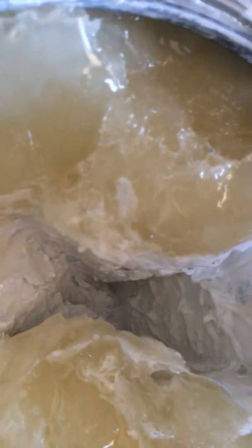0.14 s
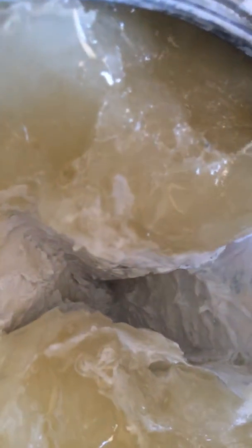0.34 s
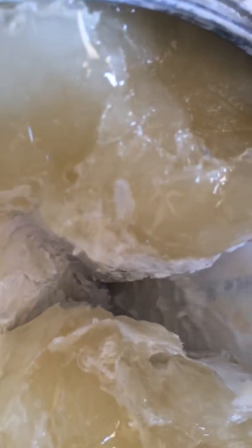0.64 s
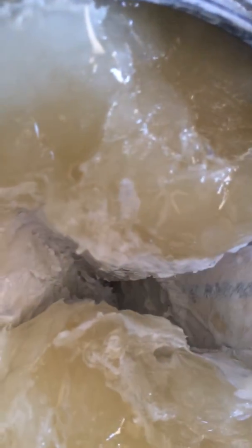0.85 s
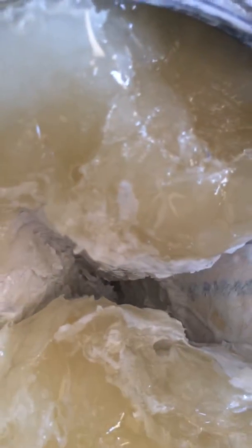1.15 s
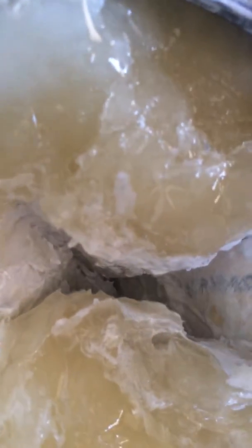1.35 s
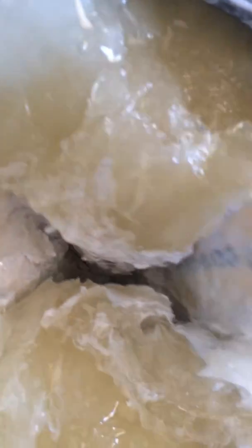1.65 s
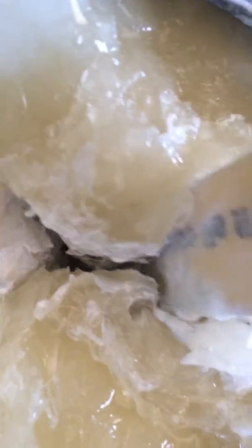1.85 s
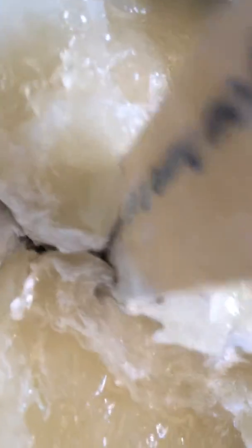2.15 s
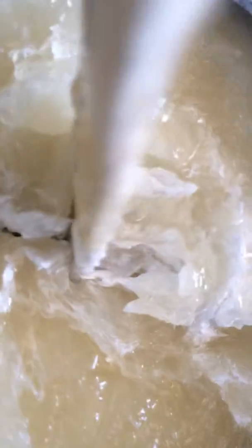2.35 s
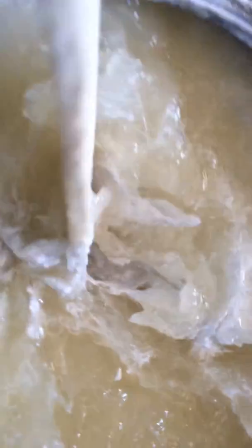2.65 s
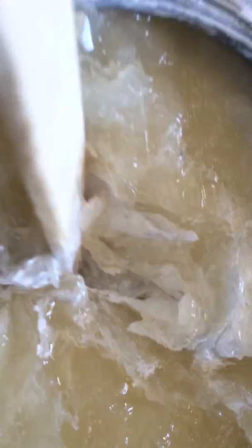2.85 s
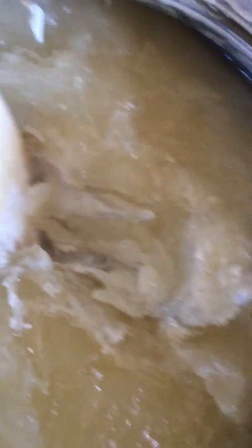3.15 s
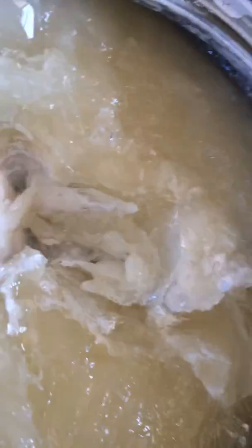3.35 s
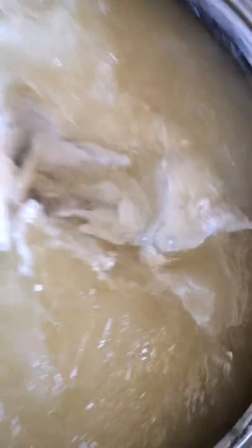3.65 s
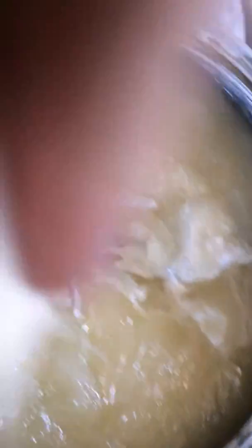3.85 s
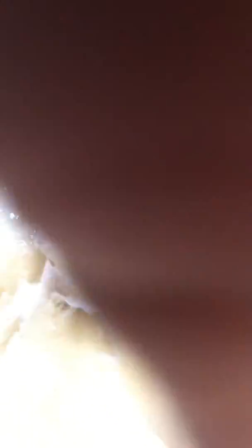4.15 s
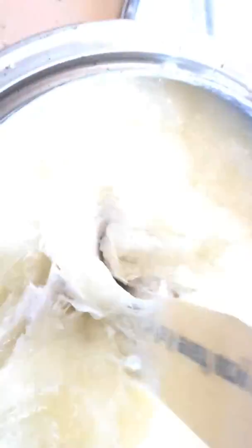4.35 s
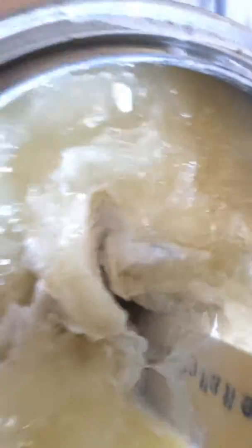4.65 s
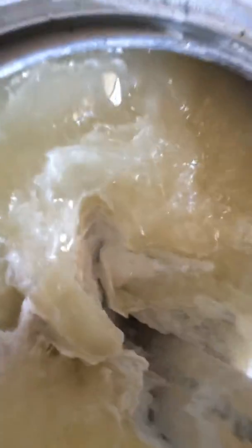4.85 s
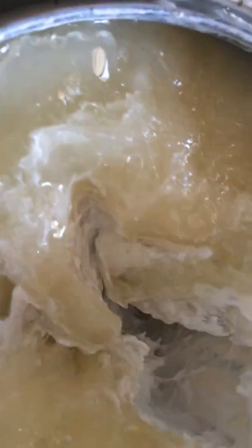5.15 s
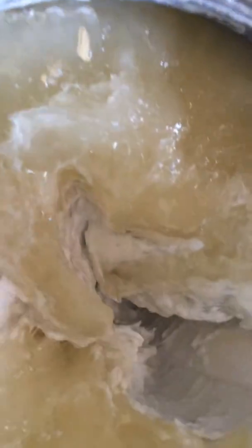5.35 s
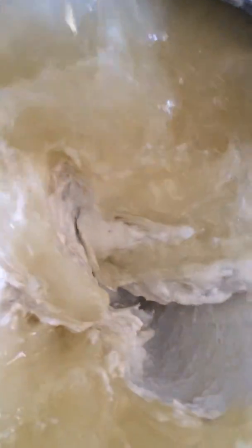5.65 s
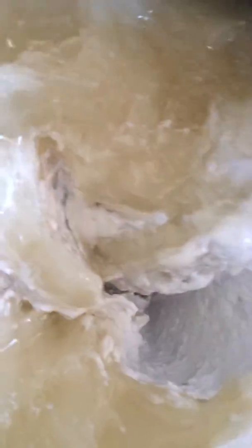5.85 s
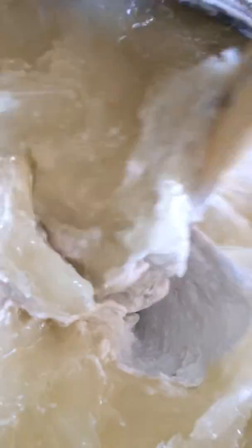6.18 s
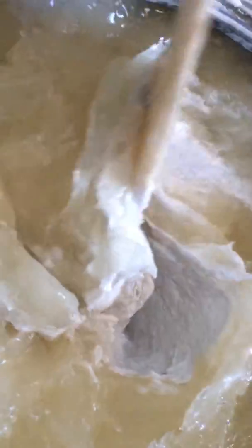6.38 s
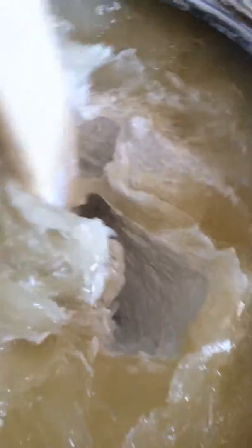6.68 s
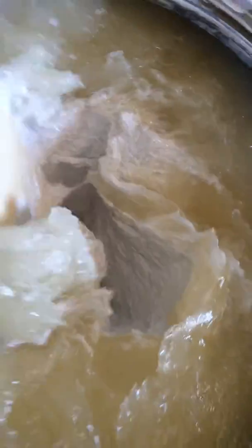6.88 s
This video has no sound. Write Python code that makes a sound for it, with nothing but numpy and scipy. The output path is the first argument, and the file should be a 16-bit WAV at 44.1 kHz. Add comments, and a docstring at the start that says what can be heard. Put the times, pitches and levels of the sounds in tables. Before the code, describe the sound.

Close up, a wooden stick works through thick, half-frozen paint in a metal can, with faint wet crackles, fizz, sharp pops and two early knocks.

```python
"""Thick, half-frozen paint fizzes faintly over a mains hum and the low rumble of a small room.
A wooden stick works through it in a metal can, close to the microphone: noise grains crackle and squelch,
swelling as folds tear and lumps are squashed. Bursts with short rings make the air pockets pop, tick runs
peel the paste off the stick, and gliding noise bands squeak. Decaying modes ring the can under knocks
and scrapes, and low decaying sines thump."""
import sys
import numpy as np
from scipy import signal
from scipy.fft import rfft, irfft, next_fast_len
from scipy.io import wavfile
from scipy.ndimage import uniform_filter1d

SR = 44100
rng = np.random.default_rng(int(sys.argv[2]) if len(sys.argv) > 2 else 0)


def file_out(sig):
    """Save sig as 16-bit WAV at sys.argv[1]."""
    # one column per channel
    cols = np.atleast_2d(sig).T
    # limit, then scale
    lim = np.clip(cols, -1, 1)
    pcm = np.round(lim * 32767).astype(np.int16)
    wavfile.write(sys.argv[1], SR, pcm)


N = 309582
T = np.arange(N) / SR


def amp(db):
    """Decibels to gain."""
    return 10 ** (np.asarray(db) / 20)


def evened(x):
    """Scales to an rms of one."""
    return x / np.sqrt(np.mean(x ** 2) + 1e-20)


def unit(x):
    """Scales to an energy of one."""
    return x / np.linalg.norm(x)


def curves(rows, at=T):
    """Each column of a table as a line through time."""
    seconds, *columns = np.transpose(rows)
    return [np.interp(at, seconds, column) for column in columns]


def add(mix, start, sound):
    """Lays a sound into the mix at start seconds."""
    part = mix[round(start * SR):][:len(sound)]
    part += sound[:len(part)]


def coloured(x, points):
    """Gives x a spectrum, at an rms of one."""
    hz, db = np.transpose(points)
    size = next_fast_len(len(x))
    log_hz = np.log(np.fft.rfftfreq(size, 1 / SR) + 1)
    gain = amp(np.interp(log_hz, np.log(hz), db))
    return evened(irfft(rfft(x, size) * gain, size)[:len(x)])


def tilted(x, tilt, low_hz, size=4096):
    """Causal filter: a slope in dB per octave above a steep low cut."""
    hz = abs(np.fft.fftfreq(size, 1 / SR)) + 20
    slope = amp(tilt * np.log2(np.maximum(hz, low_hz) / low_hz))
    log_gain = np.log(slope / np.sqrt(1 + (low_hz / hz) ** 6))
    # the Hilbert transform of the log gain supplies the minimum phase
    taps = np.fft.ifft(np.exp(np.conj(signal.hilbert(log_gain)))).real
    return signal.fftconvolve(x, taps)[:len(x)]


def resonate(x, hz, width_hz):
    """A resonance of gain one that follows the curve hz."""
    turn = np.exp(2j * np.pi * np.cumsum(hz * np.ones(len(x))) / SR)
    r = np.exp(-np.pi * abs(width_hz) / SR)
    # shift the pitch down to zero, smooth, and shift back
    return 2 * (turn * signal.lfilter([1 - r], [1, -r], x / turn)).real


def grains(per_s, spread_db, wash, clump_db):
    """Tiny ruptures come in clumps, mostly small and a few large, over a wash of still finer ones."""
    size = amp(spread_db * np.minimum(rng.exponential(1, N), 4))
    energy = size ** 2 * (rng.random(N) < per_s / SR)
    energy = signal.lfilter([1], [1, -np.exp(-1 / (0.00052 * SR))], energy)  # each is a very short burst
    bursts = np.sqrt(energy / energy.mean() + wash ** 2) * rng.standard_normal(N)
    clumps = evened(uniform_filter1d(rng.standard_normal(N), size=400))
    return evened(bursts * amp(clump_db * clumps))


def crack(decay, tail, tail_decay):
    """A sharp burst and its short scatter inside the can; decays in seconds."""
    t = T[:SR // 20]
    return rng.choice([-1, 1], len(t)) * (np.exp(-t / decay) + tail * np.exp(-t / tail_decay))


# Mains hum. Each row: frequency in Hz, level in dB rms.
HUM_PARTIALS = [(119.9, -64.5), (240, -82.5), (360, -87.5), (480, -84.5), (962, -106)]
# Colour of the quiet room. Each row: frequency in Hz, relative level in dB per Hz.
ROOM_COLOUR = [(20, -40), (40, -9), (60, 6.5), (85, 4), (130, -0.5), (220, -9), (330, -13.5), (500, -12.5),
               (800, -15.5), (1400, -21.5), (2200, -25.5), (5000, -24.5), (15000, -31.5)]
ROOM_DB = -66  # rms


def background():
    """Mains hum as steady sines, over the rumble and hiss of the room as coloured noise."""
    hum = sum(amp(db) * np.sqrt(2) * np.sin(2 * np.pi * (hz * T + rng.random()))
              for hz, db in HUM_PARTIALS)
    return hum + amp(ROOM_DB) * coloured(rng.standard_normal(N), ROOM_COLOUR)


def walls(x, t60, wet_db):
    """A faint, short return from the room: darkened noise that falls 60 dB in t60 seconds."""
    t = T[:SR // 2]
    noise = coloured(rng.standard_normal(len(t)), [(200, 2), (3000, -4.0), (15000, -8.5)])
    tail = noise * amp(-60 * t / t60) * (t > .004)
    return x + amp(wet_db) * signal.oaconvolve(x, unit(tail))[:N]


# Dull bumps as lumps give way.
# Each row: start in seconds, level in dB before decay and low cut, frequency in Hz, decay in seconds.
LUMP_THUMPS = [(0.905, -27.5, 254, 0.002), (2.4984, -27.5, 74, 0.0062), (2.499, -41.5, 163, 0.007),
               (3.512, -31.5, 141, 0.0034), (3.5125, -35, 403, 0.00095)]


def thumps():
    """A low push that dies within a cycle or two."""
    t, out = T[:SR // 10], np.zeros(N)
    for start, db, hz, decay in LUMP_THUMPS:
        add(out, start, -amp(db) * np.exp(-t / decay) * np.sin(2 * np.pi * hz * t))
    return signal.sosfilt(signal.butter(2, 46, "high", fs=SR, output="sos"), out)


# Modes of the can, damped by its paint.
# Each row: frequency in Hz, relative height of the spectral peak in dB, decay in seconds.
CAN_MODES = [(943, 1, 0.0014), (1270, -5.5, 0.00045), (1830, -12.5, 0.00099), (2460, 3.5, 0.00099),
             (3450, 1.5, 0.00067), (4680, 0.5, 0.00077), (5520, -3, 0.0005), (6730, -8, 0.00026),
             (8530, -12.5, 0.00018), (11000, -14, 0.00017)]


def can_body():
    """The can's response to a touch: each mode swells briefly and dies, with a noisy crack on top."""
    t = T[:SR // 10]
    modes = np.zeros(len(t))
    for k, (hz, db, decay) in enumerate(CAN_MODES):
        envelope = t / decay ** 2 * np.exp(-t / decay)
        modes += (-1) ** k * amp(db) * envelope * np.sin(2 * np.pi * hz * t)
    body = unit(modes)
    add(body, 0, 0.41 * unit(crack(decay=0.0016, tail=0.134, tail_decay=0.00413)))
    return body


# The stick drags along the can.
# Each row: start in seconds, end in seconds, friction level in dB rms before its rise and fall.
CAN_SCRAPES = [(.884, 0.894, -45), (0.897, 0.914, -41.5), (1.195, 1.243, -53), (1.272, 1.305, -56)]


def scrapes(body):
    """Rubbing is a stream of grains that keeps ringing the can's modes."""
    out = np.zeros(N)
    rubbing = grains(per_s=900, spread_db=0.0, wash=1.0, clump_db=0.5)
    friction = evened(signal.oaconvolve(rubbing, body)[:N])
    for start, end, db in CAN_SCRAPES:
        progress = np.clip((T - start) / (end - start), 0, 1)
        out += amp(db) * friction * np.sqrt(abs(np.sin(np.pi * progress)))
    return out


# The stick knocks on the can.
# Each row: start in seconds, level in dB before a common trim, tilt in dB per octave.
CAN_KNOCKS = [(.8851, -16.5, 5), (0.8999, -15, 0), (0.9037, -2, 1), (0.9063, -7, -10), (0.912, -16, -5),
              (0.9164, -30, 5), (1.1482, -2, 0.5), (1.1623, -29, 2), (1.305, -28, -2), (1.3288, -27, -0.5),
              (1.3932, -23.5, -1)]


def knocks(body):
    """Each hit rings the whole can once, tilted to a duller or brighter colour."""
    out = np.zeros(N)
    for start, db, tilt in CAN_KNOCKS:
        add(out, start, amp(db - 4.0) * unit(tilted(body, tilt, low_hz=770)))
    return out


# Air squeezed through slits in the paste. Each row: start in seconds, length in seconds,
# level in dB rms before the fades, start frequency in Hz, end frequency in Hz, resonance width in Hz.
AIR_SQUEAKS = [(0, 0.3, -77, 680, 742.5, 90), (1.686, 0.21, -61.5, 5300, 5165, 900),
               (1.806, 0.078, -58, 7455, 7240, 1300), (3.1878, 0.0086, -31, 12500, 8600, 2300),
               (3.291, 0.016, -43.5, 10500, 9000, 4950), (5.879, 0.085, -61.5, 4640, 4500, 895),
               (5.911, .15, -69, 677, 685, 70), (6.208, 0.092, -73, 800, 780, 70)]


def squeaks():
    """Short, fuzzy whistles of escaping air: noise through two equal gliding resonances."""
    out = np.zeros(N)
    for start, length, db, start_hz, end_hz, width_hz in AIR_SQUEAKS:
        hz = np.linspace(start_hz, end_hz, round(length * SR))
        air = rng.standard_normal(SR)[:len(hz)]
        whistle = resonate(resonate(air, hz, width_hz), hz, width_hz)
        add(out, start, amp(db) * evened(whistle) * signal.windows.tukey(len(hz), .5))
    return out


# The paste lets go of the stick in a run of slips. Each row: start in seconds, end in seconds,
# nominal first peak in dB, nominal last peak in dB, nominal slips per second.
STICK_SLIPS = [(2.213, 2.297, -54, -25.5, 180), (2.318, 2.34, -20.5, -38, 220)]


def slips():
    """Nearly regular bright ticks while the stick peels out of the paste."""
    out = np.zeros(N)
    for start, end, first_db, last_db, per_s in STICK_SLIPS:
        gap_draw, level_draw = rng.standard_normal((64, 2)).T
        times = start + np.cumsum(np.exp(0.21 * gap_draw)) / per_s
        sizes = amp(np.interp(times, [start, end], [first_db, last_db]) + 1.8 * level_draw)
        during = times < end
        out[np.round(times[during] * SR).astype(int)] = sizes[during]
    tick = tilted(crack(decay=0.00051, tail=0.15, tail_decay=0.0019), -0.89, low_hz=6000)
    return signal.oaconvolve(out, tick / abs(tick).max())[:N]


# How hard the stick shears the paste. Each row: time in seconds, effort in dB,
# brightness in dB (lifts the fizz and lowers the squelch).
SHEAR_EFFORT = [(0, -79, 1.5), (.5, -73.5, -0.5), (.83, -64, -3), (.93, -71, -7.5), (1.0, -84, 1),
                (1.36, -79, -3.5), (1.68, -62, -2.5), (2.12, -60.5, -2), (2.42, -65.5, -2),
                (2.8, -65, -1.5), (3.13, -64, 1), (3.55, -68.5, 2.5), (4.3, -66.5, -1), (4.68, -70.5, 2.5),
                (5.08, -65.5, -0.5), (5.92, -64, -1), (6.3, -68, 0.5), (7.02, -63.5, 1)]


def threads(per_s, level_db, spread_db):
    """Sticky threads part at random with faint ticks, more often with effort up to its median."""
    out, t = np.zeros(N), T[:SR // 20]
    activity = amp(curves(SHEAR_EFFORT)[0])
    rate = per_s * np.minimum(activity / np.median(activity), 1) ** 2
    for start in T[rng.random(N) < rate / SR]:
        size, pitch = rng.random(2)
        ring = unit(np.exp(-t / 0.00044) * np.sin(2 * np.pi * 1400 * 5 ** pitch * t))
        snap = unit(tilted(crack(decay=0.00011, tail=0.17, tail_decay=0.0032), -0.27, low_hz=970))
        add(out, start, amp(level_db + spread_db * size ** 2) * (snap + 0.51 * ring))
    return out


# Tears and squashes: rise in seconds, sag in dB per second, die-away time constant in seconds.
SWELL_S, SAG_DB_PER_S, RELEASE_S = 0.024, 26, 0.015


def swell(start, length):
    """The power of one tear or squash through time: attack, sagging hold, release."""
    age = np.maximum(T - start, 0)
    attack = np.minimum(age / SWELL_S, 1)
    release = np.exp(-np.clip((age - length) / RELEASE_S, 0, 20))
    return (attack * amp(-SAG_DB_PER_S * age) * release) ** 2


# A fold of paste tears open with a hiss. Each row: start in seconds, length in seconds,
# fizz level in dB before the swell, crackle level in dB before the swell.
PASTE_TEARS = [(0, .14, -61.5, -74), (0.265, 0.05, -61, -68.5), (0.673, 0.14, -61, -65.5),
               (1.637, 0.059, -39.5, -53), (1.92, .07, -59, -56), (2.202, 0.1, -45.5, -60.5),
               (2.527, 0.11, -55.5, -72), (2.85, 0.086, -58, -65), (2.97, 0.078, -45, -53),
               (3.057, 0.068, -51.5, -56), (3.136, 0.018, -44, -53), (3.333, 0.017, -49.5, -78),
               (3.684, 0.12, -53, -61), (3.85, 0.15, -55.5, -64), (3.942, 0.11, -60, -56.5),
               (4.11, 0.095, -61, -63), (4.212, 0.32, -57, -61), (4.457, 0.031, -53.5, -64),
               (4.575, 0.048, -59, -72), (4.788, 0.038, -54.5, -69), (4.893, .03, -54, -69),
               (5.019, 0.028, -53.5, -56.5), (5.245, .035, -53.5, -58.5), (5.294, 0.066, -58, -60),
               (5.546, 0.16, -60, -76.5), (5.745, 0.099, -57.5, -61), (5.897, 0.029, -56, -73),
               (6.69, 0.038, -53.5, -61)]
# A wet lump is squashed. Each row: start in seconds, length in seconds, level in dB before the swell.
LUMP_SQUASHES = [(0.784, .04, -61), (1.655, 0.098, -58), (2.52, 0.23, -65.5), (3.685, 0.052, -53),
                 (3.996, 0.031, -59.5), (4.152, .08, -63.5)]
# Offsets from the effort in dB, and the dB of squelch lost per dB of brightness.
SQUELCH_DB, CRACKLE_DB, FIZZ_DB, SQUELCH_PER_BRIGHT = -7.5, 0.16, 3, 2.76


def shear():
    """Levels of squelch, crackle and fizz: all follow the effort, and tears and squashes come on top."""
    effort_db, bright_db = curves(SHEAR_EFFORT)
    # powers, so that the layers add up
    squelch = amp(effort_db + SQUELCH_DB - SQUELCH_PER_BRIGHT * bright_db) ** 2
    crackle = amp(effort_db + CRACKLE_DB) ** 2
    fizz = amp(effort_db + FIZZ_DB + bright_db) ** 2
    for start, length, fizz_db, crackle_db in PASTE_TEARS:
        power = swell(start, length)
        fizz += amp(fizz_db) ** 2 * power
        crackle += amp(crackle_db) ** 2 * power
    for start, length, db in LUMP_SQUASHES:
        squelch += amp(db) ** 2 * swell(start, length)
    return np.sqrt([squelch, crackle, fizz])


def shifting(x, patchy_db):
    """Folds of paste open and close, so the colour drifts in patches."""
    z = signal.stft(x, nperseg=1024)[2].T
    patches = rng.standard_normal(z.shape)
    for _ in range(2):
        patches = uniform_filter1d(patches, size=9, axis=0)  # along time
        patches = uniform_filter1d(patches, size=11, axis=1)  # along frequency
    return evened(signal.istft((z * amp(patchy_db * evened(patches))).T, nperseg=1024)[1][:N])


# The furrow behind the stick is an air cavity.
# Each row: time in seconds, resonance in Hz before any wander, its share of the crackle from 0 to 1.
FURROW_CAVITY = [(0, 1370, 0.45), (.7, 1360, 0.49), (1.65, 1490, 0.62), (1.95, 1800, 0.84),
                 (2.2, 1790, 0.46), (2.75, 1880, 0.17), (3.1, 1110, 0.01), (3.55, 2620, 0.14),
                 (3.98, 3420, 0.4), (4.3, 2400, 0), (5.05, 2400, 0.07), (5.4, 1460, 0.22),
                 (5.85, 1620, 0.52), (6.17, 1780, 0.62), (6.45, 1870, 0.04), (7, 1680, 0)]
FURROW_WANDER = 0.044  # the soft walls keep moving: rms share of the pitch
# Colours of the three layers of the paste, low to high. Each row: frequency in Hz, relative level in dB per Hz.
SQUELCH_COLOUR = [(100, -4.5), (220, 3.5), (330, 0.5), (500, 0), (700, 1.5), (1000, -5), (1400, -17),
                  (2500, -54)]
CRACKLE_COLOUR = [(600, -34), (1100, 0), (1700, 1.5), (2500, 2.5), (3400, -0.5), (4300, 0), (5500, -6.5),
                  (9000, -37)]
FIZZ_COLOUR = [(2500, -51), (4000, -26), (4800, -10.5), (6000, 0), (7200, 2), (9000, 2.5), (11000, 0),
               (13000, -3), (15000, -1.5)]


def paste():
    """Shearing paint ruptures in three bands, squelch, crackle and fizz; the furrow colours the lower two."""
    squelch_level, crackle_level, fizz_level = shear()
    furrow_hz, share = curves(FURROW_CAVITY)
    wander = evened(uniform_filter1d(rng.standard_normal(N), size=1200))
    furrow_hz = furrow_hz * (1 + FURROW_WANDER * wander)
    hollow, free = np.sqrt(np.clip([share, 1 - share], 0, 1))
    ruptures = grains(per_s=1100, spread_db=2.5, wash=0.64, clump_db=2.0)
    inside = grains(per_s=900, spread_db=3.5, wash=1.0, clump_db=2.0)
    # two modes of the furrow
    upper = evened(resonate(resonate(inside, furrow_hz, width_hz=475.2), furrow_hz, width_hz=474.2))
    lower = evened(resonate(inside, 0.44 * furrow_hz, width_hz=110))
    crackle = hollow * upper + free * shifting(coloured(ruptures, CRACKLE_COLOUR), patchy_db=1.5)
    squelch = evened(0.18 * hollow * lower + free * coloured(ruptures, SQUELCH_COLOUR))
    fizz = shifting(coloured(ruptures, FIZZ_COLOUR), patchy_db=1.5)
    return squelch_level * squelch + crackle_level * crackle + fizz_level * fizz


# The loudest air pockets bursting. Each row: start in seconds, level in dB before the trims of each part,
# crack tilt in dB per octave, pocket resonance in Hz.
POCKET_POPS = [(.039, -32.5, 0.5, 12200), (.345, -41.5, -7.5, 5000), (.5286, -27.5, -0.5, 6530),
               (0.6013, -31, -3, 7000), (.752, -34.5, 18.5, 11800), (0.7736, -29.5, -6, 8900),
               (2.0814, -28.5, 5, 6750), (2.104, -21.5, 5, 8700), (2.1452, -20.5, 1, 6600),
               (2.1621, -22, -3, 9200), (2.173, -17.5, 2.5, 7440), (2.1826, -18.5, 6, 7950),
               (2.3559, -28, 1.5, 9000), (2.5506, -19.5, 3.5, 8200), (2.6155, -31, 2, 8800),
               (2.6572, -28, 4.5, 6860), (2.876, -16, -1.5, 9150), (2.9882, -5, 3, 10840),
               (3.0717, -27, -7, 2800), (3.299, -10.5, -0.5, 6080), (3.319, -26, -2.5, 5170),
               (3.4913, -6.5, 1.5, 2639), (3.847, -28.5, -1, 3410), (3.961, -30, 5, 3100),
               (4.2024, -26, -1.5, 8150), (4.332, -29.5, -2, 2260), (4.3944, -19, 1, 9500),
               (4.588, -34.5, -4.5, 3970), (4.7589, -29.5, 1.5, 9700), (4.9702, -32.5, -1, 4330),
               (5.1367, -34, -1, 6960), (5.267, -32, 1.5, 2660), (5.275, -38, -3, 2690),
               (5.349, -27.5, -1.5, 9000), (5.3898, -30, 3, 3060), (5.532, -22.5, -1.5, 7240),
               (5.568, -17.5, 6, 9500), (5.6867, -34, -6.5, 4700), (5.7783, -25, -2.5, 6740),
               (5.8353, -24, -1.5, 4900), (5.8888, -33.5, -6, 3570), (6.4658, -25, -3.5, 2820),
               (6.5412, -26, -2, 3230), (6.6872, -27, 3.5, 8000), (6.7124, -22.5, 1, 5760),
               (6.8952, -27.5, -2.5, 5800)]
POCKET_DB, POCKET_CYCLES = -3.5, 1.8  # trim; decay constant in cycles, the same at any pocket size
FURROW_RING_DB = -6.5  # trim of the furrow's ring, further scaled by its share squared


def pops():
    """A film of paint snaps; the pocket under it and the furrow ring for a few cycles."""
    out, t = np.zeros(N), T[:SR // 20]
    lead = SR // 500  # samples of silence ahead, as evening the spectrum spreads the snap both ways
    for start, db, tilt, hz in POCKET_POPS:
        burst = np.pad(crack(decay=0.0013, tail=0.33, tail_decay=0.0019), (lead, 0))
        spectrum = rfft(burst)
        snap = unit(irfft(spectrum / np.sqrt(uniform_filter1d(abs(spectrum) ** 2, size=70))))
        # the slope pivots in the mid treble
        add(out, start - lead / SR, amp(db + 2.0 - tilt * 2.5) * tilted(snap, tilt, low_hz=1165))
        age = t * hz / POCKET_CYCLES
        add(out, start, amp(db + POCKET_DB) * age * np.exp(-age) * np.sin(2 * np.pi * hz * t))
        furrow_hz, share = curves(FURROW_CAVITY, at=start)
        ring = np.exp(-t / 0.0016) * np.sin(2 * np.pi * furrow_hz * t)
        add(out, start, amp(db + FURROW_RING_DB) * share ** 2 * ring)
    return out


def scene():
    """Everything in the can, heard in the room."""
    body = can_body()
    touches = thumps() + scrapes(body) + knocks(body)
    releases = squeaks() + slips() + threads(per_s=42, level_db=-44.5, spread_db=11)
    stirring = touches + releases + paste() + pops()
    return (background() + walls(stirring, t60=0.14, wet_db=-21.0))[None]


def record(dry):
    """The microphone softens the top octave; then the recorder's band limit."""
    soft = signal.lfilter(*signal.butter(2, 14000, fs=SR), dry)
    band = signal.firwin(401, 15450, window=("kaiser", 8), fs=SR)  # edge in Hz
    return signal.oaconvolve(soft, band[None], "same")


dry = scene()
out = record(dry)
file_out(out)
```